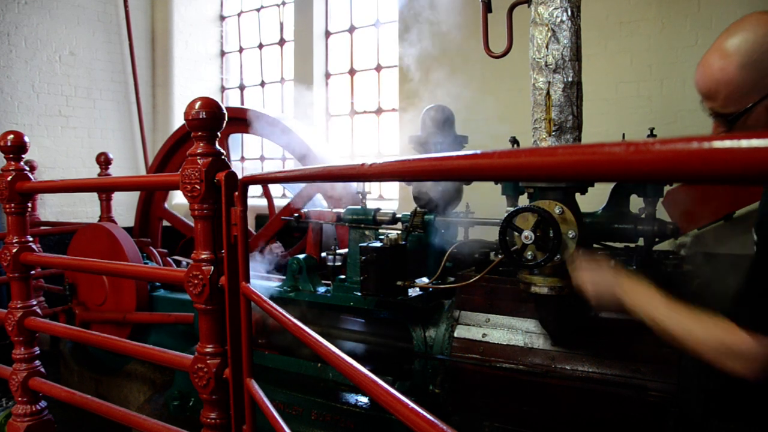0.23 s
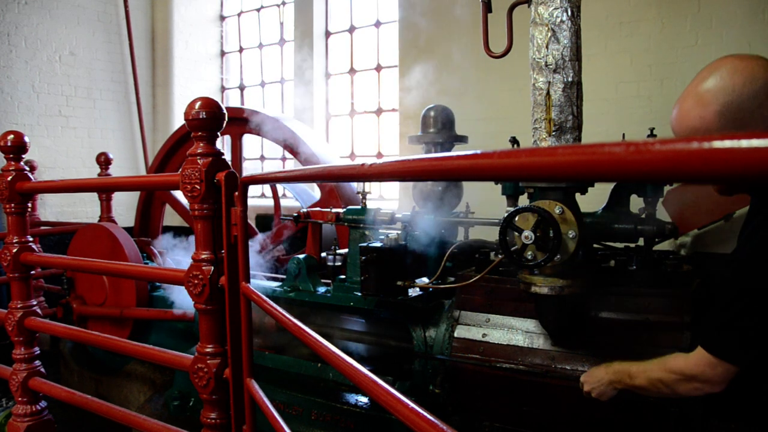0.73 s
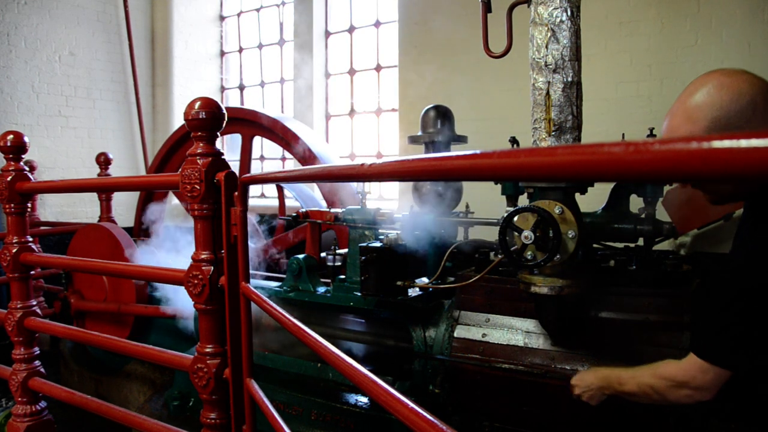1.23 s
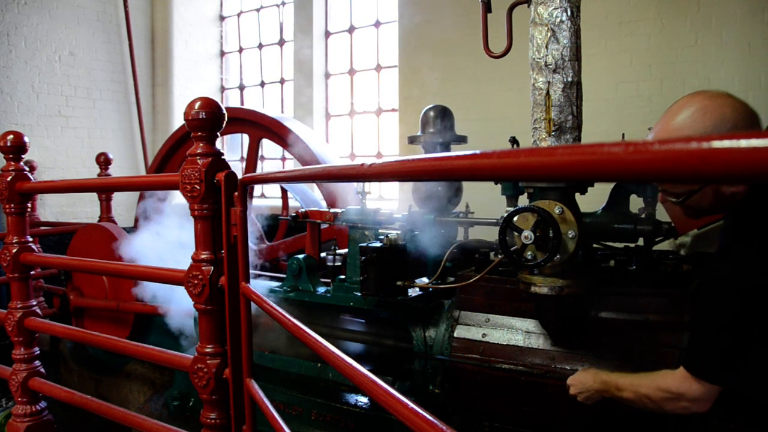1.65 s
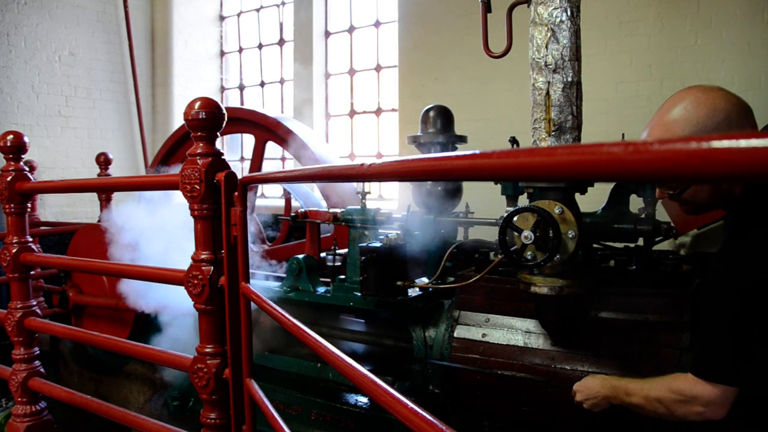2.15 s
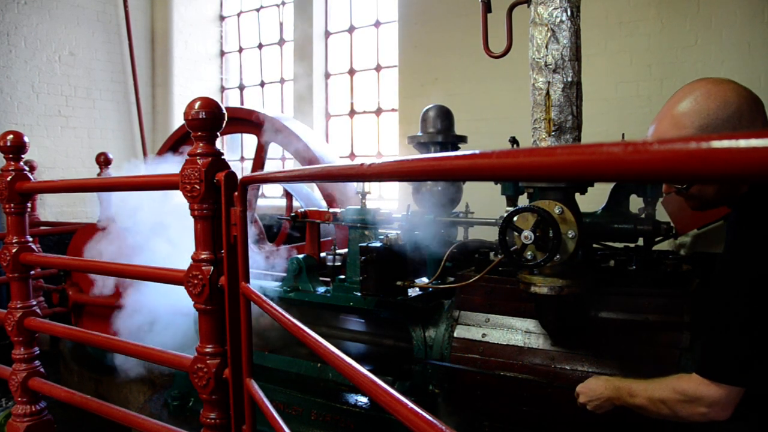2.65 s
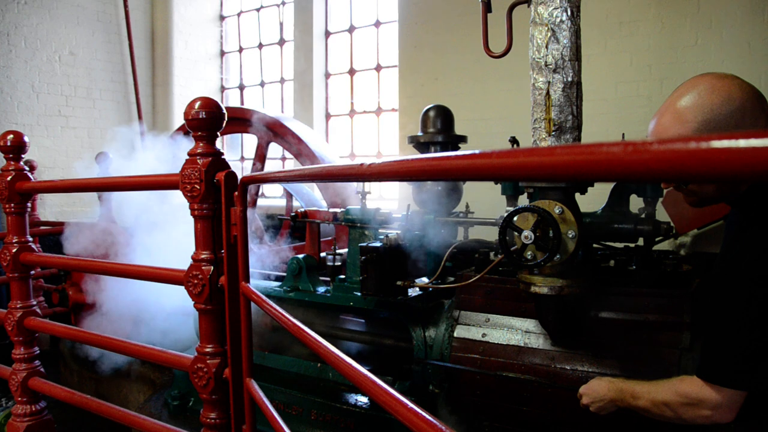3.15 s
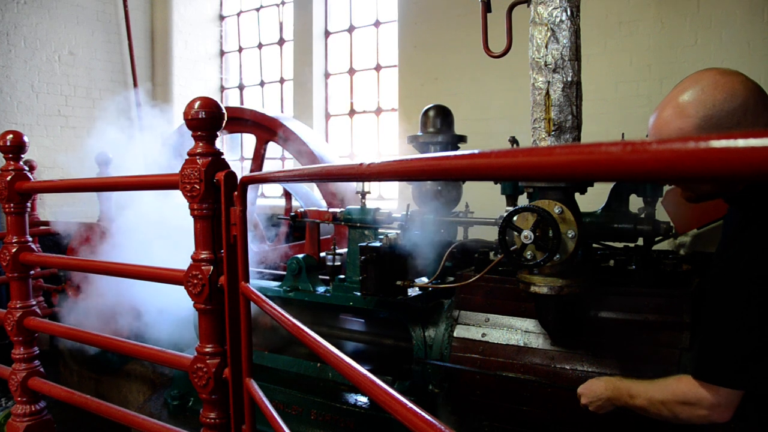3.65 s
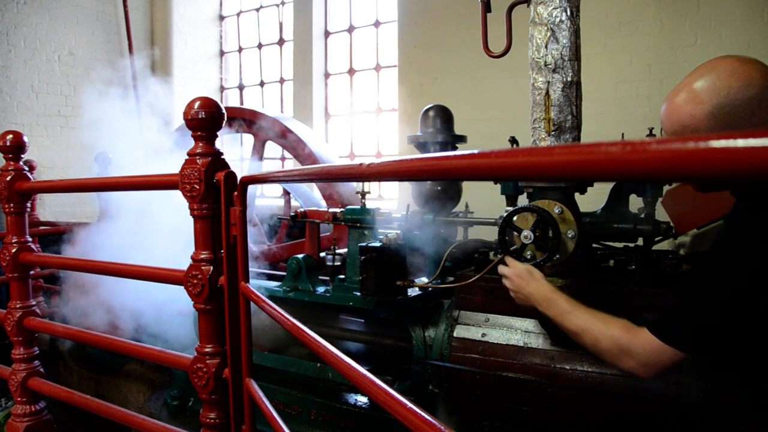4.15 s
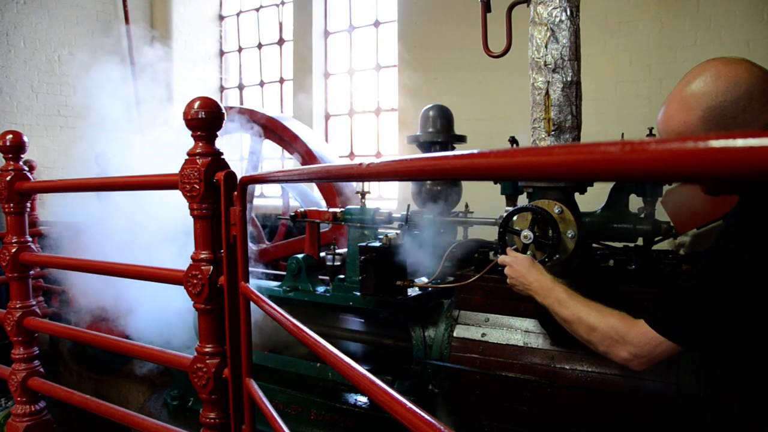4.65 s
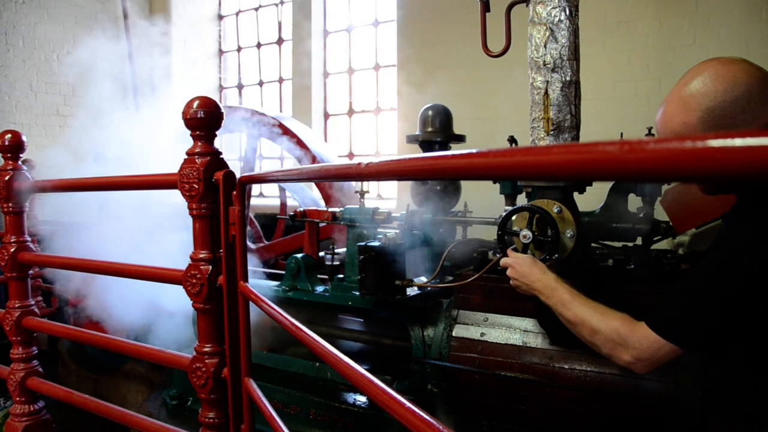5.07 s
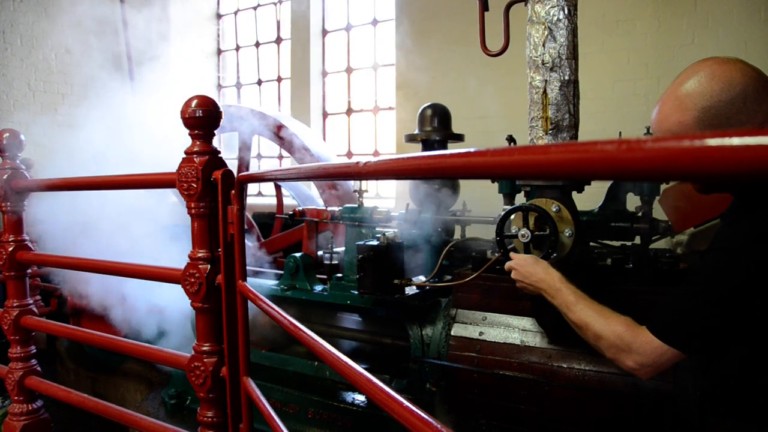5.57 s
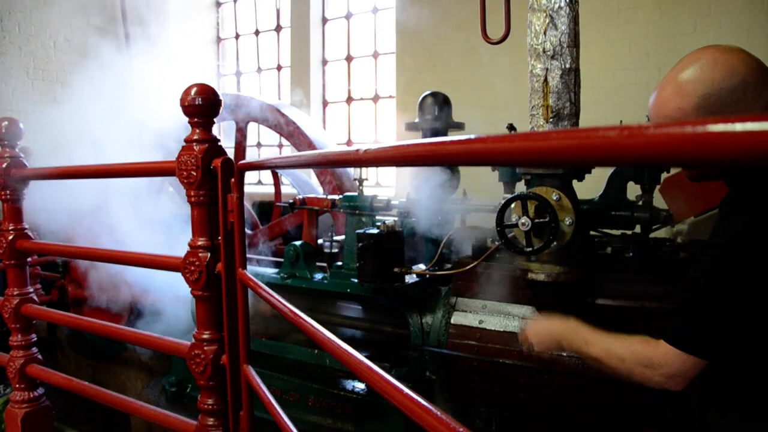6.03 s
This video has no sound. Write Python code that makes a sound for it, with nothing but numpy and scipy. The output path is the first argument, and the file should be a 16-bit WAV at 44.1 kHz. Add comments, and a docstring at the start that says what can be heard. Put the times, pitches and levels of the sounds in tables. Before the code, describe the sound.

From 0 s a thin, bright steam leak hisses steadily from a shaft seal on a large old engine, finely fluttering and becoming slightly wetter. Faint wavering motor hum and low building rumble sit far beneath; soft, breathy half-whistles come and go in the first two seconds. At about 2.2 s a drain cock snaps open, almost instantly adding a much louder, broad roaring jet. It is wet and coarse until about 3.6 s, with low, lumpy slugs of water at 2.4, 2.8 and 3.2 s and a gurgling pipe rush cresting near 3.5 s, then dying away. Afterwards the blast becomes drier, thinner and brighter while staying strong, with airy whistling bands clearest around 4.3 to 5 s. It blows on unbroken to the end at about 6.4 s. Close, centred pickup in a bare, hard room, with no distinct echo tail.

```python
"""A drain cock on the cylinder of a large old steam engine opens and blows as the engine is warmed through.
Its jet is shaped noise: wet and roaring at first, thinner and brighter as the condensate (water) clears.
Water rushes low and lumpy in the drain pipe; narrow bands of noise half whistle at the outlets.
A leaking gland (shaft seal) hisses from the start, made of fluttering noise like the jet.
Behind them, wavering tones and low noise make the faint machinery of a bare engine room."""
import sys
import numpy as np
from scipy import signal
from scipy.fft import rfft, irfft, next_fast_len
from scipy.io import wavfile

SR = 44100
rng = np.random.default_rng(int(sys.argv[2]) if len(sys.argv) > 2 else 0)


def to_wav(sig):
    """Store sig (one row per channel, or 1-D mono) as 16-bit WAV at the path in sys.argv[1].

    Samples outside -1..1 are clipped; the rate is SR.
    """
    pcm = np.clip(np.atleast_2d(sig), -1, 1) * 32767
    pcm = np.round(pcm).astype(np.int16)
    wavfile.write(sys.argv[1], SR, pcm.T)  # frames by channels


N = 277830

# Colour of the rumble of the building: pitch_hz, relative_level_db_per_hz
RUMBLE_SPECTRUM = [(15, -12), (30, -5), (60, -3), (90, -10), (135, 4.5), (200, -3), (290, 11.5), (420, -18),
                   (700, -32)]
# Motor tones, of which one close pair beats: pitch_hz, level_db (rms, before MACHINERY_DB), pitch_wander_hz
MOTOR_TONES = [(74, -69, 2.0), (97.1, -57, .12), (100.0, -59, .12), (133, -65, 2.0), (181, -67, 2.0),
               (195, -67, 2.0), (485.5, -49.5, .6)]

# Colour of the turbulence, before resonances and wetness: pitch_hz, relative_level_db_per_hz
LEAK_SPECTRUM = [(60, -37), (200, -10), (600, -10.5), (1200, -7), (1900, -2.5), (2800, -4), (4400, 0),
                 (5500, -7.5), (6300, -0.2), (7500, 0.5), (9500, -4), (11500, -14), (14300, -21.5),
                 (15500, -29)]
COCK_SPECTRUM = [(60, -55), (200, -37), (500, -31), (750, -17), (1200, -10.5), (1800, -2), (3200, -2.5),
                 (4500, -5.5), (6000, 0.5), (7400, 0), (9000, -10.5), (11000, -16), (12500, -30),
                 (15500, -41)]
RUSH_SPECTRUM = [(120, -35), (330, -10), (560, -9.5), (740, 0), (1100, -1.5), (1600, 1.5), (3000, -30)]

# Resonances of the outlets and the ironwork round them: pitch_hz, width_hz, boost_db
LEAK_RESONANCES = [(730, 58, 1.5), (1995, 89, 2), (2100, 250, 2), (4030, 127, 2.5), (6900, 100, -0.5),
                   (7190, 130, 7.5), (7530, 210, 4), (9400, 64, 3)]
COCK_RESONANCES = [(743, 135, 4.5), (1169, 12, 8.4), (1480, 126, 2.5), (1694, 14, 7.4), (2225, 28, 3.8),
                   (2386, 88, 2.9), (2551, 115, 2.9), (2851, 12, 4.9), (2902, 53, 4.9), (3220, 135, 3.9),
                   (3560, 35, 6.2), (3647, 164, 4.1), (3820, 23, 6.5), (4174, 29, 6.1), (4920, 31, 5.0),
                   (5003, 18, 5.2), (5205, 27, 3.7), (5866, 51, 5.8), (5967, 68, 2.5), (6659, 87, 2.7),
                   (6959, 23, 5.8), (7011, 29, 5.6), (7929, 95, 3.7), (8660, 92, 6.1), (8929, 170, 6.0),
                   (9055, 106, 4.2), (9638, 79, 5.8), (9979, 15, 4.9), (10082, 255, 4.5), (10782, 68, 5.2)]
RUSH_RESONANCES = [(341, 11, 9), (597, 7.9, 6), (670, 9, 6), (694, 12, 5.2), (742, 14, 4)]

# Wet steam is slower, so it roars lower: pitch_hz, change_db_per_db_of_wetness
WET_COLOUR = [(250, -1), (800, 1.16), (1500, 1.0), (2300, 0.97), (3400, 0.1), (5000, 0.3), (7500, -0.42),
              (10500, -0.46), (14000, -0.7)]

# Slugs of water pushed through the pipe: middle_s, length_s, peak_level_db (before the lumpiness)
WATER_SLUGS = [(2.42, 0.15, -35), (2.81, 0.19, -37), (3.196, 0.43, -33.5), (3.595, 0.3, -44)]
# Droplets catch at an outlet and it half whistles: middle_s, length_s, pitch_hz, width_hz,
# level_db (rms before the swell)
WHISTLES = [(0.03, 0.3, 3410, 70, -33), (0.08, 0.4, 5030, 250, -34), (0.397, 0.18, 4360, 60, -32),
            (0.42, 0.2, 7140, 150, -39), (0.8, 0.48, 2070, 110, -36), (1.274, 0.25, 1990, 110, -33),
            (1.6, 0.35, 4020, 200, -35), (2.6, 0.35, 2550, 140, -28), (2.785, 0.19, 710, 80, -37.5),
            (2.83, 0.25, 2010, 200, -29), (3.46, 0.24, 2480, 130, -25.5), (4.35, 0.46, 2500, 300, -24.5),
            (4.53, 0.35, 3220, 200, -23.5), (4.6, 0.7, 3650, 220, -26.5), (5.04, 0.2, 3580, 110, -25),
            (5.85, 0.87, 1810, 90, -38)]

# Narrow cancellations in the microphone port: pitch_hz, width_hz, change_db
PORT_NOTCHES = [(5700, 135, -15), (6920, 190, -8), (15000, 200, -6)]

# Machinery: the gain on all of it, the rumble's rms level before that gain, and the fade
MACHINERY_DB, RUMBLE_DB = 0.4, -52
FADE_S, FADING_S, FADE_DB = 3.1, 1.0, 3.5

# Gland leak: it grows wetter as water gathers; once the cock is open it weakens and dries
LEAK_DB, LEAK_SAG_DB_PER_S = -19.5, 0.4
LEAK_WET_DB, LEAK_WETTING_DB_PER_S, LEAK_DRYING_DB_PER_S = 1.5, 1.14, 0.07

# Rush of condensate in the drain pipe: it builds to a crest and dies away
RUSH_CREST_S, RUSH_DB, RUSH_RISE_DB_PER_S, RUSH_FALL_DB_PER_S = 3.46, -31.5, 5.5, 9.5

# Drain cock: it snaps open, then its flow grows slowly
OPEN_S, OPENING_S = 2.18, 0.079
COCK_DB, COCK_GROWTH_DB_PER_S = -14.5, 0.31
# Water builds up in the jet after opening, is carried out for a while, then runs out
WATER_ARRIVES_S, WATER_HOLD_S, WATER_RUNS_OUT_S = 0.28, 1.03, 0.23
# Wetness without the water, what the water adds, and the steady drying as the cylinder warms
COCK_WET_DB, WATER_WET_DB, DRYING_DB_PER_S = 0.0, 3, 1.24

CUTOFF_HZ = 15650
TIME = np.arange(N) / SR
SIZE = next_fast_len(N, real=True)
# Pitch of each frequency bin; at least 1 Hz so that its logarithm exists
BIN_HZ = np.maximum(np.arange(SIZE // 2 + 1) * SR / SIZE, 1)


def from_db(db):
    """Turn decibels into a gain."""
    return 10 ** (np.asarray(db) / 20)


def rms_one(x):
    """Scale a signal to an rms (average strength) of 1."""
    return x / np.sqrt(np.mean(x ** 2) + 1e-20)


def ramp(start, length):
    """Rise from 0 to 1 over `length` seconds, then stay there."""
    return np.clip((TIME - start) / length, 0, 1)


def swell(middle, length):
    """Rise smoothly to 1 and fall again, within `length` seconds."""
    return np.cos(np.pi * np.clip((TIME - middle) / length, -.5, .5))


def before_after(moment):
    """Give the seconds still to go until a moment, and the seconds gone since."""
    return np.maximum(moment - TIME, 0), np.maximum(TIME - moment, 0)


def drift(rate):
    """Wander smoothly at random with a spread of 1, changing about `rate` times a second."""
    step = 40  # samples between the random points
    r = np.exp(-2 * np.pi * rate * step / SR)
    noise = rng.standard_normal(N // step + 2002)
    # Smooth the noise twice; drop the start, where the filter is still settling
    slow = signal.lfilter([1], [1, -2 * r, r * r], noise)[2000:]
    return np.interp(np.arange(N) / step, np.arange(len(slow)), rms_one(slow))


def at_hz(points, hz):
    """Read a table between its points, with pitch spaced by ratio as the ear hears it."""
    known_hz, values = np.transpose(points)
    return np.interp(np.log(hz), np.log(known_hz), values)


def resonances(modes):
    """Add up peaks and dips in decibels and give the gain at each frequency."""
    total_db = 0
    for hz, width, db in modes:
        total_db = total_db + db / (1 + (2 * (BIN_HZ - hz) / width) ** 2)
    return from_db(total_db)


def reflections(wall_db, t60):
    """Colour a sound as the direct path plus dense echoes, which fall 60 dB in `t60` seconds."""
    t = np.arange(SR // 2) / SR
    # No echo arrives in the first 6 ms
    echoes = rng.standard_normal(len(t)) * from_db(-60 * t / t60) * (t > .006)
    echoes = echoes / np.linalg.norm(echoes)
    # Only the gain at each frequency is kept, so no trailing echo is added
    return np.abs(1 + from_db(wall_db) * rfft(echoes, SIZE))


def turbulence(spectrum, gain=1):
    """Make the frequency bins of random churning: coloured noise with an rms of 1."""
    bins = rfft(rng.standard_normal(SIZE)) * from_db(at_hz(spectrum, BIN_HZ)) * gain
    return bins / np.std(irfft(bins, SIZE))


def steam(flow_db, wetness, spectrum, gain, surge_db, flutter_db, flutter_rate, count=11):
    """Blow a jet: flow sets level, wetness sets colour, the whole surges and eddies flutter by band."""
    bins = turbulence(spectrum, gain)
    centres = np.geomspace(400, 13000, count)
    jet = 0
    for hz, share in zip(centres, np.eye(count)):
        # Neighbouring bands overlap and together pass the whole sound
        band_gain = np.interp(np.log(BIN_HZ), np.log(centres), share)
        band = irfft(bins * band_gain, SIZE)[:N]
        wet_db = wetness * at_hz(WET_COLOUR, hz)
        jet = jet + band * from_db(wet_db + flutter_db * drift(flutter_rate))
    return jet * from_db(flow_db + surge_db * drift(15))


def machinery(waver_db):
    """Hum with wavering motor tones over a low noise rumble, growing fainter halfway through."""
    sound = from_db(RUMBLE_DB) * irfft(turbulence(RUMBLE_SPECTRUM), SIZE)[:N]
    for hz, db, wander in MOTOR_TONES:
        cycles = np.cumsum(hz + wander * drift(4.8)) / SR + rng.random()
        level = from_db(db + waver_db * drift(2.9))
        # A sine of rms 1 peaks at the square root of 2
        sound = sound + np.sqrt(2) * level * np.sin(2 * np.pi * cycles)
    return sound * from_db(MACHINERY_DB - FADE_DB * ramp(FADE_S, FADING_S))


def gland_leak():
    """Hiss thinly through the gland, sputtering a little with the water in its packing."""
    until_open, since_open = before_after(OPEN_S)
    flow_db = LEAK_DB - LEAK_SAG_DB_PER_S * since_open
    wetness = LEAK_WET_DB - LEAK_WETTING_DB_PER_S * until_open - LEAK_DRYING_DB_PER_S * since_open
    gain = resonances(LEAK_RESONANCES) * reflections(wall_db=-9.5, t60=0.41)
    return steam(flow_db, wetness, LEAK_SPECTRUM, gain,
                 surge_db=0.34, flutter_db=0.53, flutter_rate=27)


def whistles():
    """Half whistle: turbulence through a narrow resonance swells and fades."""
    sound = 0
    for middle, length, hz, width, db in WHISTLES:
        b, a = signal.iirpeak(hz, hz / width, fs=SR)
        tone = rms_one(signal.lfilter(b, a, rng.standard_normal(N)))
        sound = sound + from_db(db) * swell(middle, length) * tone
    return sound


def condensate(lumpy_db):
    """Rush low and lumpy as water is torn up in the open drain pipe, swelling with each slug."""
    until_crest, since_crest = before_after(RUSH_CREST_S)
    stream = from_db(RUSH_DB - RUSH_RISE_DB_PER_S * until_crest - RUSH_FALL_DB_PER_S * since_crest)
    slugs = sum(from_db(db) * swell(middle, length) for middle, length, db in WATER_SLUGS)
    rush = irfft(turbulence(RUSH_SPECTRUM, resonances(RUSH_RESONANCES)), SIZE)[:N]
    lumps = from_db(lumpy_db * drift(25))
    return rush * ramp(OPEN_S, OPENING_S) * (stream + slugs) * lumps


def drain_cock():
    """Blow loudly from the cylinder drain: a roar while it carries water, then an ever drier hiss."""
    _, since_open = before_after(OPEN_S)
    water_in = ramp(OPEN_S, WATER_ARRIVES_S)
    water_out = ramp(OPEN_S + WATER_ARRIVES_S + WATER_HOLD_S, WATER_RUNS_OUT_S)
    wetness = COCK_WET_DB + WATER_WET_DB * (water_in - water_out) - DRYING_DB_PER_S * since_open
    flow_db = COCK_DB + COCK_GROWTH_DB_PER_S * since_open
    gain = resonances(COCK_RESONANCES) * reflections(wall_db=-9.0, t60=0.35)
    jet = steam(flow_db, wetness, COCK_SPECTRUM, gain,
                surge_db=-0.09, flutter_db=0.7, flutter_rate=20)
    return ramp(OPEN_S, OPENING_S) * jet


def scene():
    """Add all sources at one point, alike in both channels."""
    background = machinery(waver_db=0.5) + gland_leak()
    sound = background + whistles() + condensate(lumpy_db=1.8) + drain_cock()
    return np.stack([sound, sound])


def record(dry):
    """Cut the notches of the microphone port, then remove the very top of the treble."""
    coloured = irfft(rfft(dry, SIZE) * resonances(PORT_NOTCHES), SIZE)[:, :N]
    # A steep low-pass filter: 0.1 dB ripple below the cutoff, 90 dB down above it
    low_pass = signal.ellip(12, .1, 90, CUTOFF_HZ, fs=SR, output="sos")
    return signal.sosfilt(low_pass, coloured)


dry = scene()
out = record(dry)
to_wav(out)
```